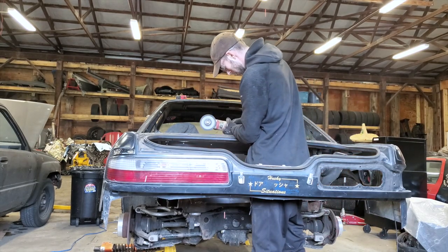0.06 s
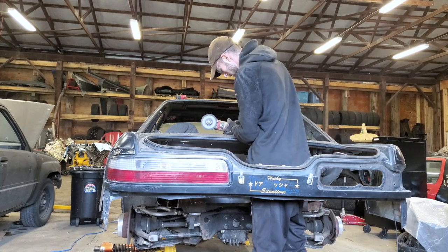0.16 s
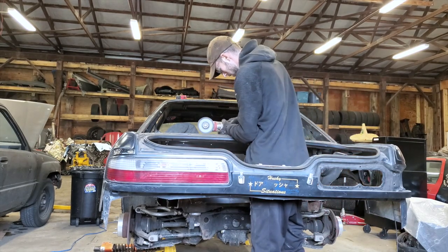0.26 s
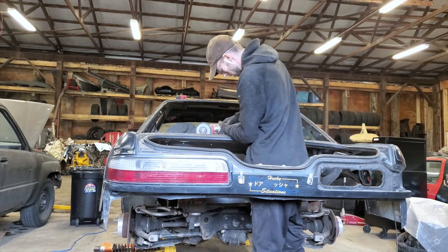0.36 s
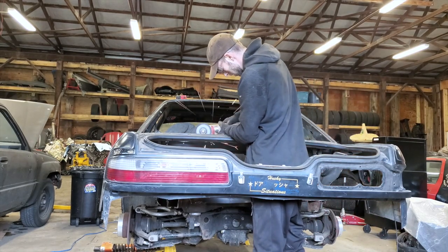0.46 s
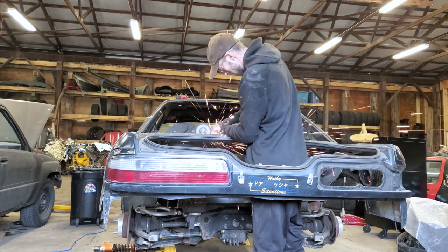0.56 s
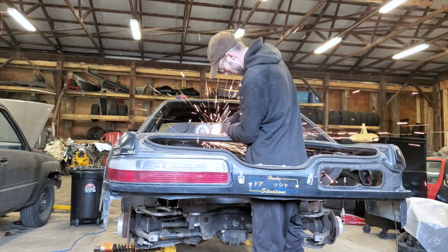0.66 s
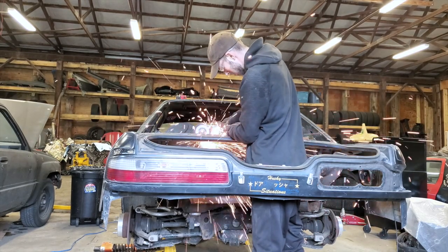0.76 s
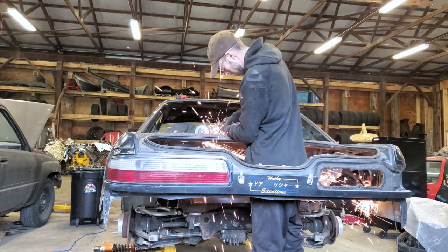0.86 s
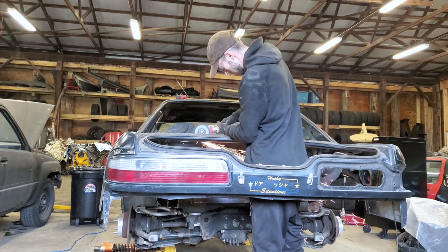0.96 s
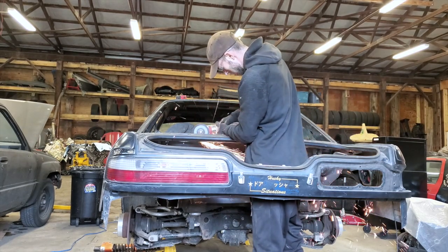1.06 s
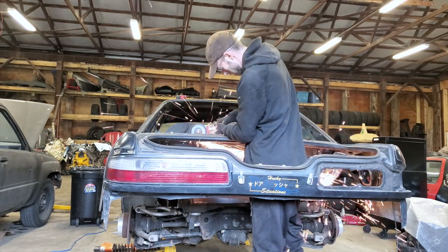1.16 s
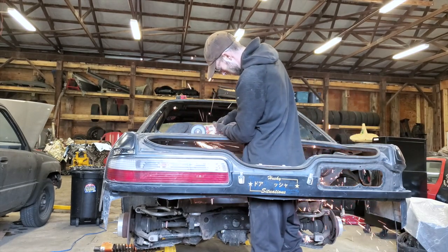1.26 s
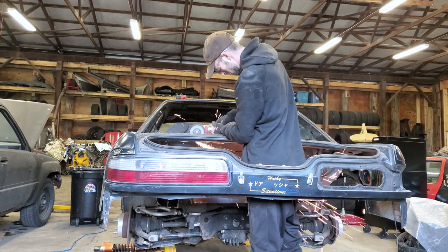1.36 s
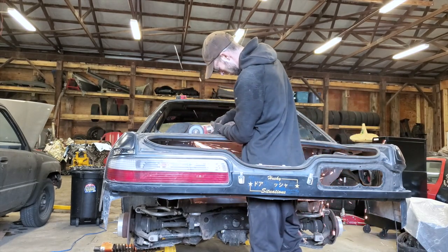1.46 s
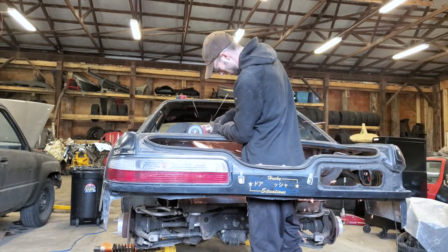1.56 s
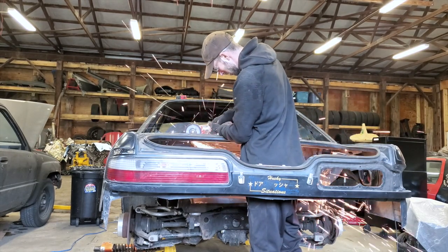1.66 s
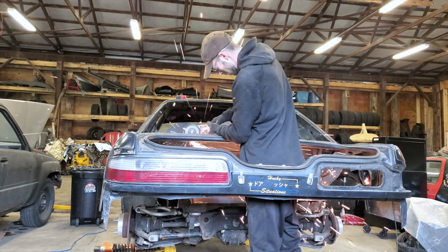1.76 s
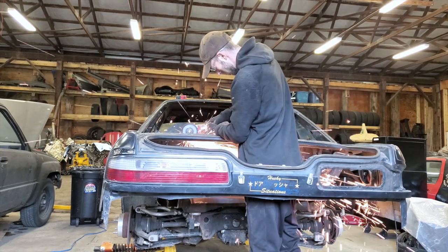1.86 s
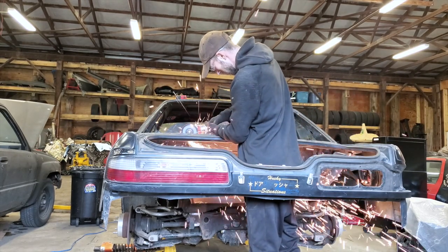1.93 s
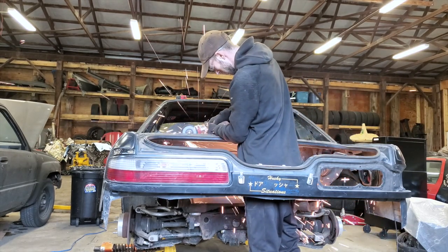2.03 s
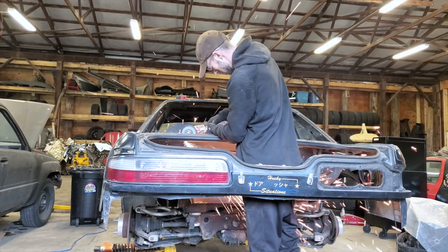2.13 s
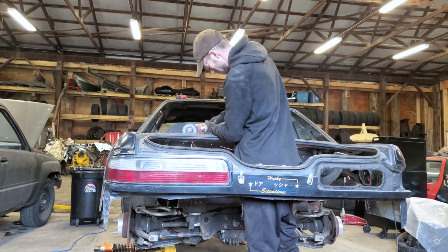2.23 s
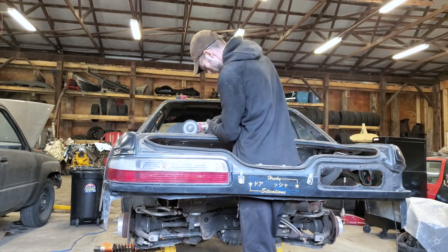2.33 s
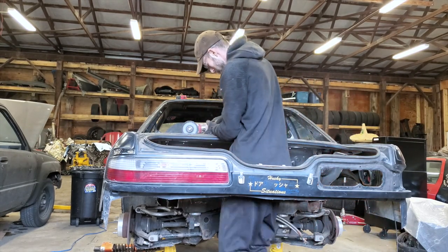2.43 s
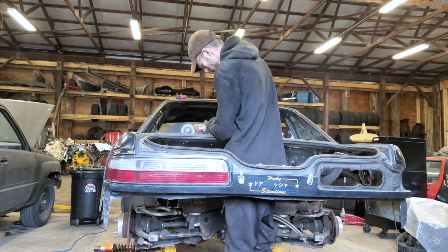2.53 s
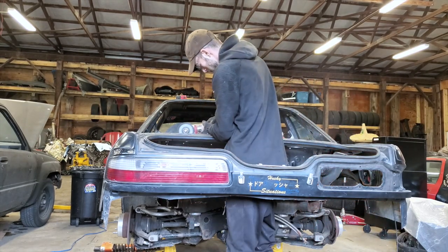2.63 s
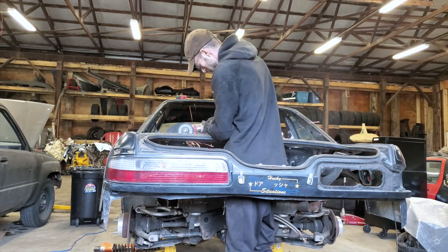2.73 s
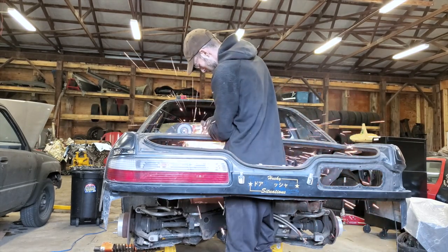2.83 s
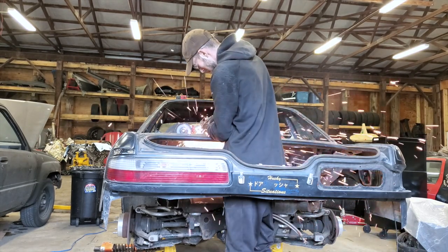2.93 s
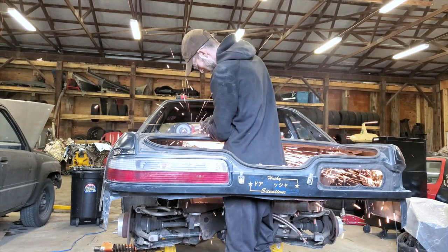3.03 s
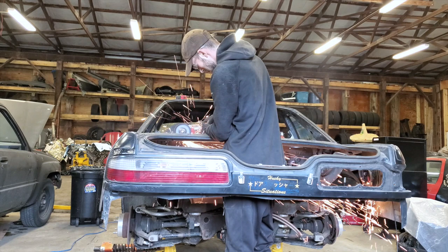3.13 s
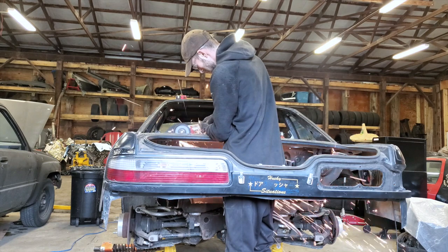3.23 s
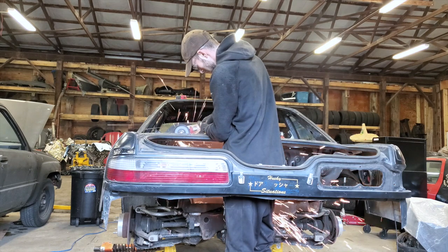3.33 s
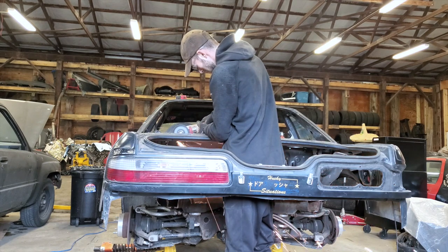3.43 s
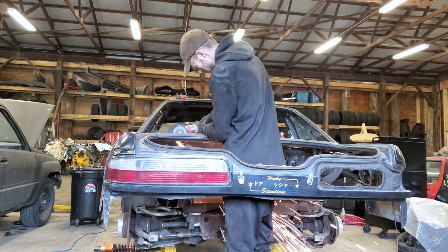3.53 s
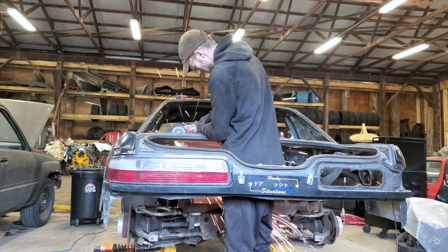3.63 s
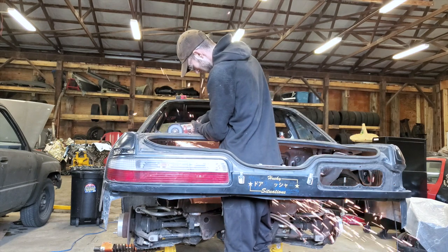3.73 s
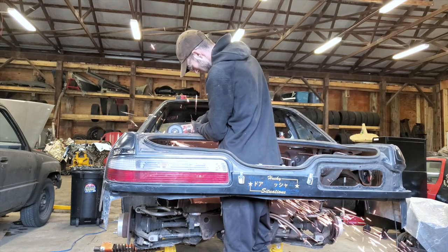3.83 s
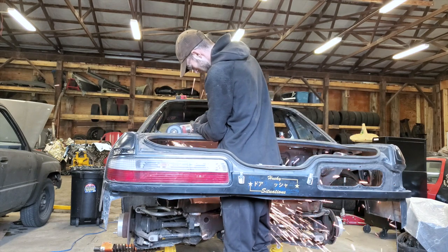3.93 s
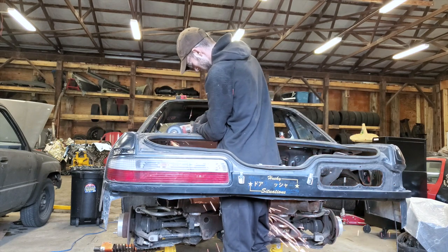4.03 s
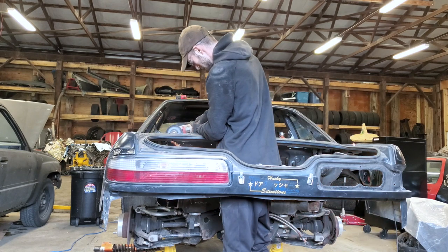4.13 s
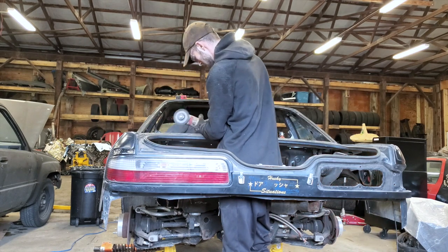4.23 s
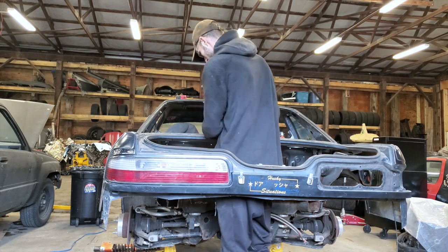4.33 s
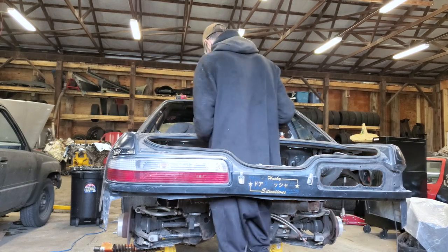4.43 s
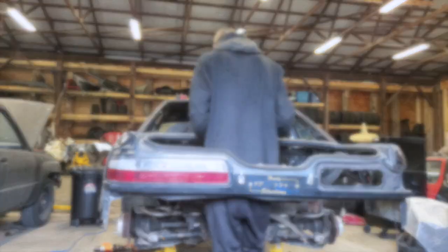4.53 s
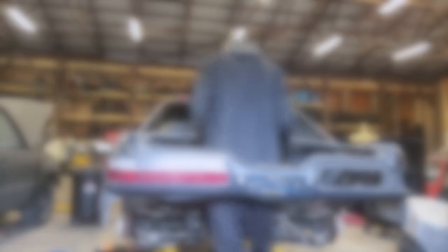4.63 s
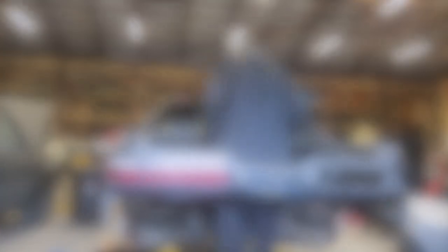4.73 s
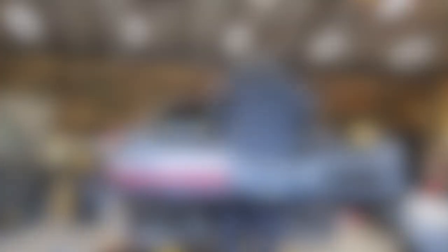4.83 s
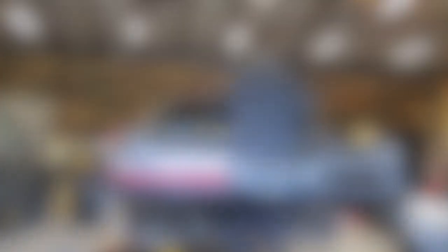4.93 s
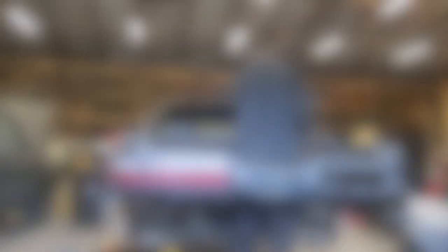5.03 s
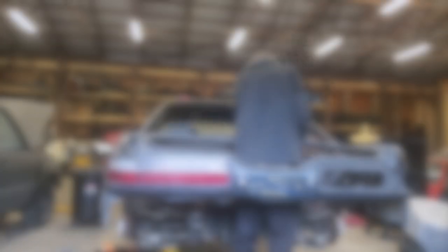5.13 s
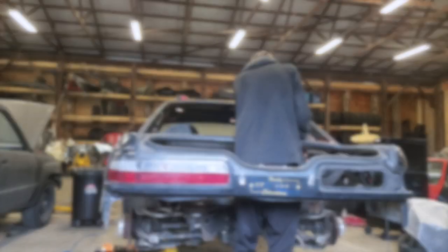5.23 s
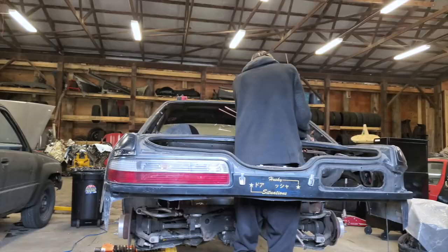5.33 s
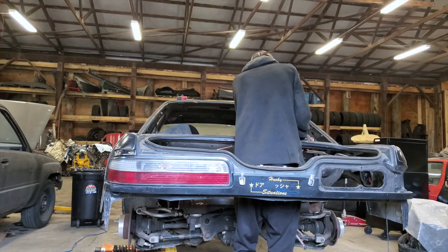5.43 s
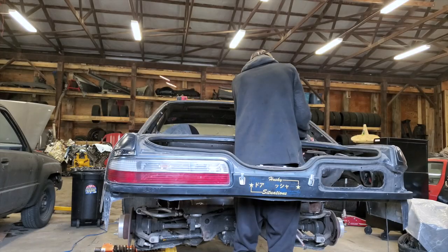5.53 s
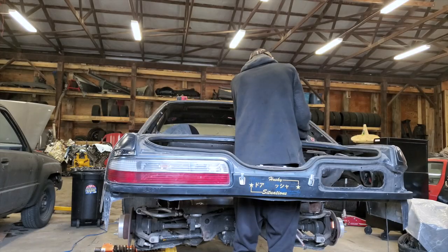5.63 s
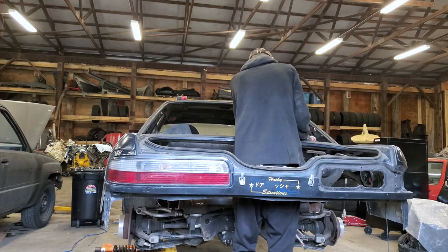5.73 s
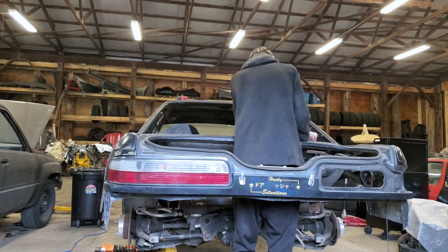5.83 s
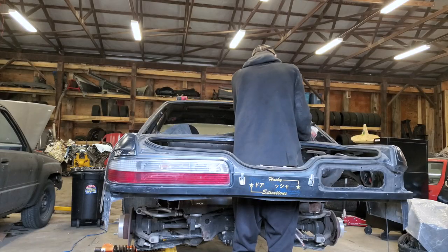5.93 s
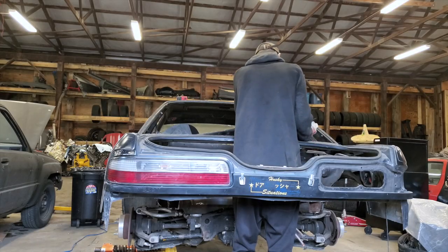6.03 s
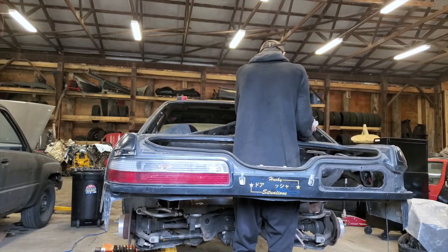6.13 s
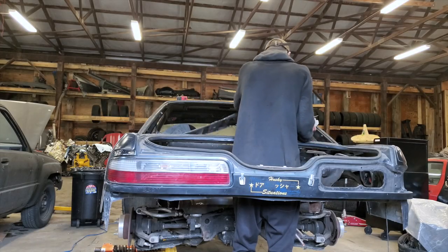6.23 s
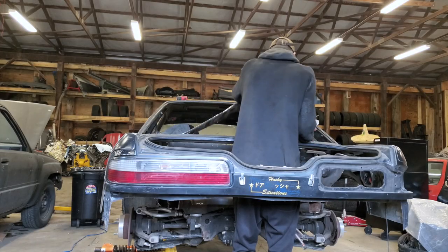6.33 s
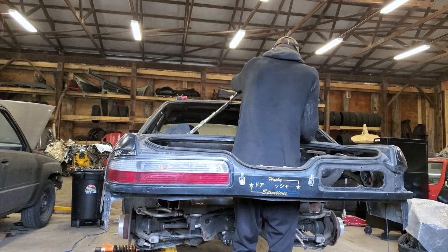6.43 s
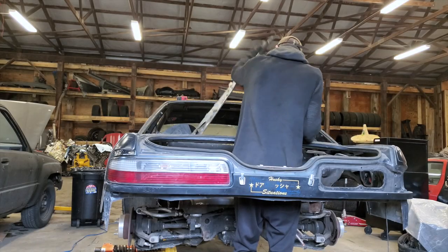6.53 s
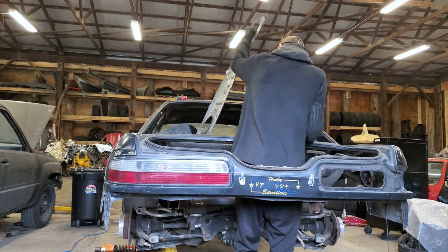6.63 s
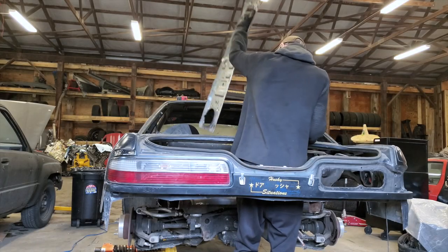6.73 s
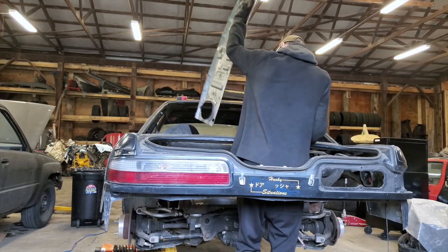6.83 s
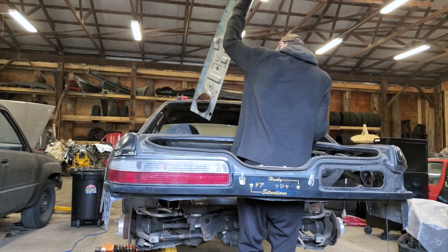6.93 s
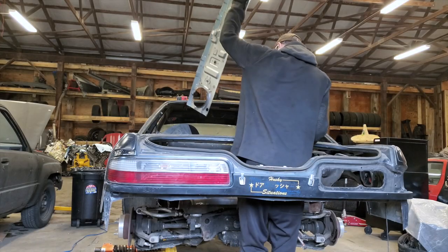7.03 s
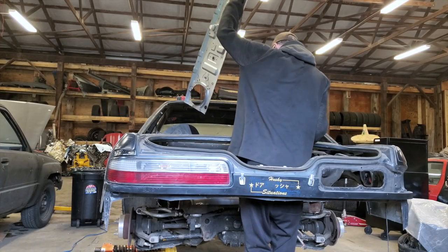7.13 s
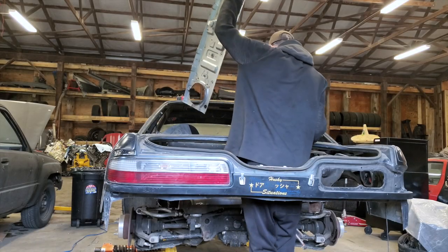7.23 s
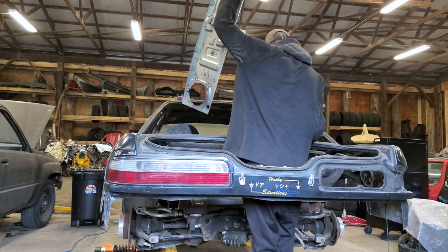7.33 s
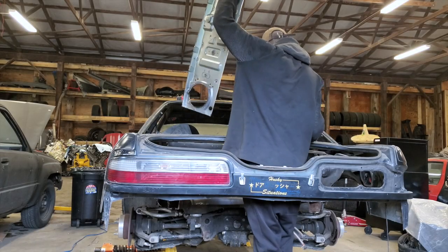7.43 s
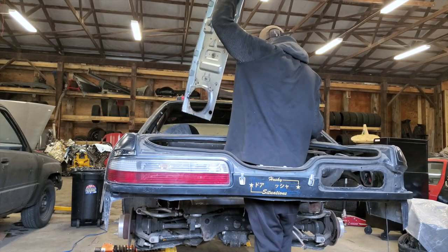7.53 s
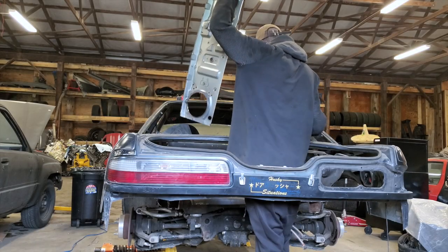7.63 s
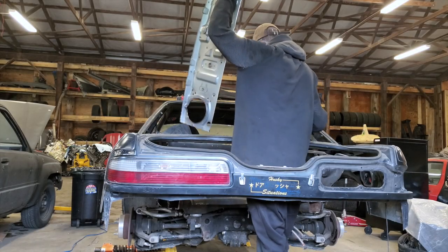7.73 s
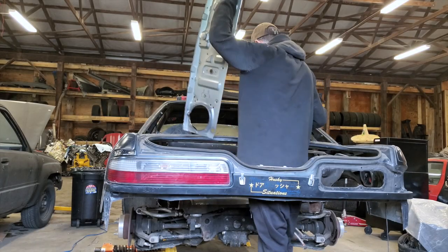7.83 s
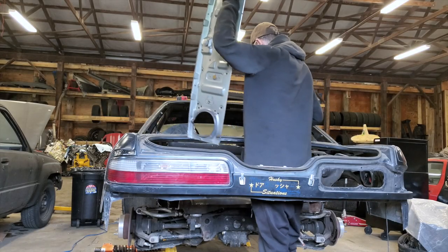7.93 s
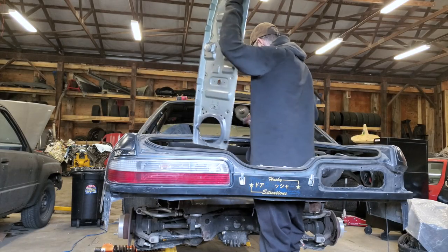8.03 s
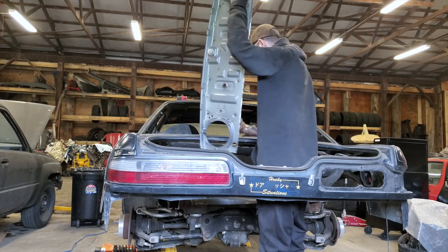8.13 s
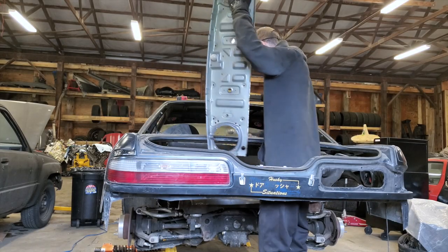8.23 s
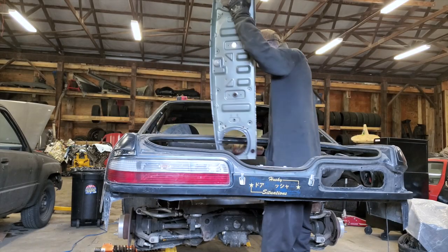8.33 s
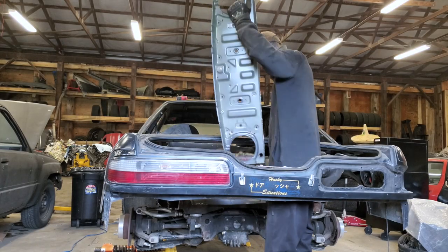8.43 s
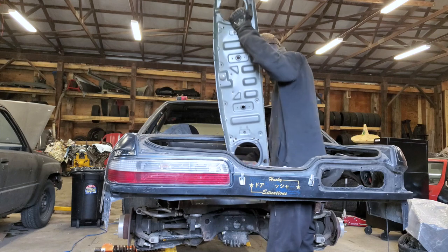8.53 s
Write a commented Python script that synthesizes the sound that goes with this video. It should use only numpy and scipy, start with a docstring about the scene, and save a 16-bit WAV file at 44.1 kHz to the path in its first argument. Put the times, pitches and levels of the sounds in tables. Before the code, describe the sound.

An angle grinder cuts sheet steel from the very start, sped up so that it sounds unnaturally high and quick. Its hissing rasp carries brief sharp screeches, and the whine sags as the disc bites and rises when freed. It spins free briefly just after the start and again around 2.2 to 2.5 seconds, then cuts until about 4.2. Between 4.4 and 5 seconds the sound blends down to natural pace, and a last, lower cut growls and rings until about 5.7. The motor then coasts down with a falling whistle, clearest near 6.4 seconds. From 6.8 the loose panel gives faint squeals, and from 7 to 8.5 it scrapes in short gritty strokes, catches on ragged edges and bumps the hollow car body about four times. A blower roars and hums underneath in the large workshop, its low rumble swelling toward the end.

```python
"""Angle grinder cutting a car body

An angle grinder cuts out a steel panel in a big workshop, where a blower roars and hums. The first
cuts pass in fast motion, four times higher and quicker: the disc bogs down as it bites and whines
up when freed. They blend into a last cut at natural pace. Then the motor coasts down, and the loose
panel scrapes and bumps as it is lifted out."""
import sys
import numpy as np
from scipy import signal
from scipy.fft import rfft, irfft, next_fast_len
from scipy.io import wavfile
from scipy.ndimage import uniform_filter1d, map_coordinates

SR = 44100
rng = np.random.default_rng(int(sys.argv[2]) if len(sys.argv) > 2 else 0)


def file_out(sig):
    """Save sig as 16-bit WAV at sys.argv[1]."""
    # one column per channel
    cols = np.atleast_2d(sig).T
    # limit, then scale
    lim = np.clip(cols, -1, 1)
    pcm = np.round(lim * 32767).astype(np.int16)
    wavfile.write(sys.argv[1], SR, pcm)


N = 377937
T = np.arange(N) / SR

PACE = 4  # how many times quicker fast motion is
GEAR = 3.47  # motor turns per disc turn

# Disc speed in each run of the motor. Each row: time in seconds, turns per second as heard.
OPENING_SPEED = [(0, 453), (.06, 520), (.09, 500)]
FIRST_SPEED = [(0.3, 382), (0.338, 469), (0.376, 504.6), (0.45, 547.4), (0.488, 636), (.582, 632.8),
               (0.67, 612.7), (.802, 536.3), (0.92, 499), (.946, 508), (1.014, 552), (1.048, 563),
               (1.106, 535.5), (1.166, 528.3), (1.24, 462), (1.284, 456), (1.328, 469.3), (1.352, 501),
               (1.42, 526.6), (1.45, 527), (1.484, 509.8), (1.632, 547.6), (1.74, 491.2), (1.856, 488),
               (1.936, 450.4), (2.0, 439.3), (2.076, 462.7), (2.22, 452), (2.3, 470.6)]
SECOND_SPEED = [(2.3, 470.3), (2.37, 518.1), (2.43, 609.4), (2.534, 665.8), (2.798, 649.2), (2.848, 631),
                (3.006, 505.8), (3.12, 460.8), (3.162, 455.8), (3.298, 461), (3.454, 497.4), (3.504, 526.4),
                (3.684, 526.6), (3.738, 509), (3.792, 457.5), (3.885, 432.2), (3.972, 438.2), (4.006, 401),
                (4.03, 394), (4.11, 415.7), (4.122, 435.4), (4.218, 493.7), (4.3, 482.4)]
LAST_SPEED = [(4.5, 156.5), (4.85, 165), (4.97, 163.7), (5.21, 159.7), (5.43, 157.5), (5.608, 153.1),
              (5.69, 154), (5.85, 131.4)]
# The disc touches the steel. Each row: start and end in seconds, force in dB, seating
# (0 is only grazing, 1 is deep in the slot).
CUTS = [(-.2, .04, -1, 1), (.305, .49, -6, .05), (.475, 2.215, 0, 1), (2.55, 2.72, -2.5, .1),
        (2.7, 4.11, -.3, 1), (4.08, 4.22, -5, .95), (4.43, 4.6, -14, .05), (4.56, 4.8, -7.5, .05),
        (4.845, 5.63, -1, .9)]
# The hand leans on the grinder. Each row: middle and half length in seconds, extra force in dB.
PUSHES = [(0.01, 0.03, 13), (0.438, 0.099, 12.5), (0.554, 0.06, 11), (0.722, .13, 10), (1.23, 0.34, 4.5),
          (2.647, 0.072, 9), (2.78, 0.062, 8), (2.979, 0.1, 10), (3.882, 0.098, 3.5), (4.057, 0.099, 3),
          (4.688, 0.11, 2.5), (5.093, 0.058, 5.5), (5.356, 0.062, 5), (5.52, 0.15, 6.5)]
# The rim loses its grip. Each row: middle and half length in seconds, share of the bite lost.
SLIPS = [(1.05, 0.083, 0.35), (1.41, 0.075, 0.27), (2.74, 0.068, 0.14), (3.55, 0.12, 0.19),
         (4.07, 0.06, 0.26)]
# Tone colour of the fast cuts and the last cut. Each row: frequency in Hz, gain in dB.
FAST_COLOUR = [(50, -38), (150, -23), (370, -18.5), (520, -15), (950, -9.5), (1500, -11), (2200, -11.5),
               (2800, -7), (4000, -7), (5500, -3.5), (6800, -7), (8500, -3.5), (11500, -6.5), (16000, -10)]
LAST_COLOUR = [(70, -59), (130, -25), (230, -16.5), (330, -15), (480, -13.5), (1000, -11.5), (1700, -11),
               (3400, -5), (5500, -6.5), (8200, -1), (10500, -2.5), (14000, 3), (16000, -2.5)]
# Where the panel rings while it is cut. Each row: frequency and width in Hz, boost in dB.
FAST_PANEL_PEAKS = [(1900, 310, 4), (2670, 310, 6.5), (3870, 220, 3), (4370, 300, 4), (7580, 260, 2)]
LAST_PANEL_PEAKS = [(607, 32, 4), (775, 25, 1.5), (952, 52, 4.5), (1137, 44, 2), (3440, 110, 4.3)]
# Bands of the sound swell and fade: ringing steel in the cuts, bright hiss while the disc spins free.
# Each row: middle and half length in seconds, frequency and width in Hz, boost in dB.
FLARES = [(0.008, 0.095, 590, 900, 10), (0.573, 0.13, 8900, 1400, 7), (0.54, 0.11, 2530, 400, 4),
          (0.69, 0.063, 6700, 1020, 2), (0.71, 0.13, 1100, 360, 3), (0.277, 0.17, 9670, 1400, 7),
          (2.07, 0.14, 12400, 2440, 2), (2.486, 0.11, 9300, 2540, 10), (2.78, 0.076, 2800, 990, 1.5),
          (2.975, 0.1, 5153, 1400, 6), (3.85, 0.076, 8300, 2600, 4.5), (4.08, 0.22, 950, 600, 9),
          (3.96, .13, 4380, 250, 7), (1.8, .08, 4410, 250, 4), (4.17, 0.32, 453, 110, 10.5),
          (5.3, 0.11, 10220, 1570, 3), (5.0, 0.061, 963, 73, 8), (5.11, 0.07, 1291, 90, 18),
          (5.09, 0.078, 1125, 77, 10), (5.12, 0.07, 3370, 110, 15), (5.07, 0.093, 4200, 530, 3.5),
          (5.31, 0.15, 2395, 150, 18), (5.42, .16, 625, 70, 7.5), (5.46, 0.08, 947, 80, 11.5),
          (5.5, 0.094, 3900, 530, 3), (5.59, 0.07, 775, 56.4, 5.5), (5.5, 0.21, 14770, 2400, 5)]
# Single overtones of the disc ring out as brief, sharp screams.
# Each row: middle and half length in seconds, multiple of the disc speed, level in dB.
SCREAMS = [(0.552, 0.039, 5, -34), (0.626, .039, 4, -30.5), (0.672, 0.046, 3, -36.5),
           (.68, 0.027, 9, -31.5), (0.73, 0.072, 5, -40), (0.746, 0.025, 6, -30), (.76, 0.037, 9, -30),
           (.8, 0.061, 14, -22.5), (0.815, 0.031, 7, -31), (0.863, 0.05, 8, -35), (1.141, .059, 7, -36),
           (1.23, 0.058, 12, -32), (1.254, 0.046, 6, -34.5), (1.28, 0.034, 7, -28.5), (1.28, 0.038, 8, -37),
           (1.434, 0.032, 7, -32.5), (1.48, 0.025, 5, -35), (1.565, 0.024, 7, -33),
           (1.618, 0.059, 5, -29.5), (1.752, 0.037, 5, -31.5), (1.802, 0.049, 9, -26),
           (1.918, 0.048, 6, -34), (1.928, 0.036, 4, -37), (1.938, 0.022, 9, -29.5),
           (1.985, 0.046, 10, -32), (2.078, 0.097, 9, -37), (2.186, .034, 6, -29), (2.766, 0.064, 3, -35),
           (2.766, 0.091, 4, -38), (2.926, 0.022, 6, -31.5), (2.964, 0.072, 5, -33), (3.01, 0.019, 15, -26),
           (3.025, 0.086, 10, -27.5), (3.19, .067, 7, -38.5), (3.27, 0.13, 10, -31.5),
           (3.566, 0.045, 9, -39), (3.587, 0.039, 5, -40), (3.794, 0.027, 6, -34), (3.876, 0.03, 10, -28),
           (3.97, 0.02, 10, -27.5), (3.926, 0.053, 6, -39), (4.03, 0.023, 11, -24), (4.094, 0.027, 9, -29)]
# The housing gives off some whine pitches best. Each row: pitch in Hz at natural pace, level in dB.
HOUSING_RESPONSE = [(170, -68), (225, -64), (275, -58), (350, -60), (430, -57), (462, -57), (550, -73)]
# Where the panel drones most in fast motion. Each row: frequency and width in Hz, boost in dB.
DRONE_PEAKS = [(526, 50, 21), (611, 58, 15.5)]
# The panel's growl in the last cut: base levels in dB at 1, 2 and 3 times the disc speed.
GROWL_LEVELS = [-43, -45.5, -43.5]
# How that growl swells. Each row: time in seconds, gain in dB.
GROWL_SWELL = [(4.9, -13), (5.13, 3), (5.35, -4.5), (5.63, -6), (5.8, -19), (6.1, -36)]
# The loose panel rubs on the body. Each row: middle and length in seconds, level in dB.
SCRAPES = [(7.182, 0.044, -39), (7.2, 0.21, -32), (7.472, 0.16, -36.5), (7.688, 0.077, -36),
           (7.803, 0.045, -33), (7.855, 0.066, -30.5), (8.159, 0.05, -31.5), (8.386, 0.085, -29.5),
           (8.513, 0.054, -31.5)]
# Where the scraped panel rings. Each row: frequency and width in Hz, gain in dB.
SCRAPE_MODES = [(1524, 400, -13), (2532, 180, 22), (4000, 670, -15), (7150, 340, -21)]
# The panel bumps the body shell. Each row: start in seconds, level in dB.
KNOCKS = [(7.036, -47), (7.378, -43), (7.674, -34.5), (7.88, -38)]
# The notes of the hollow shell. Each row: pitch in Hz, gain in dB, seconds to fade by 60 dB.
SHELL_MODES = [(179.4, -13.5, .5), (326, -5.5, 0.23), (367, -4, 0.38), (400, -5, 0.27), (661, 4, 0.14),
               (1158, 6, 0.19)]
# The ragged edge catches. Each row: start and decay time in seconds, level in dB.
CATCHES = [(7.175, 0.027, -34), (7.37, .03, -37), (7.872, .025, -38), (7.92, .02, -33), (8.04, .015, -37),
           (8.08, 0.016, -32), (8.125, .012, -38), (8.163, 0.014, -34), (8.19, .03, -34),
           (8.225, .018, -32), (8.365, .012, -39), (8.425, .03, -35), (8.46, .02, -35)]
# Tone colour of those catches. Each row: frequency in Hz, gain in dB.
CATCH_COLOUR = [(300, -13), (1500, 1.5), (4300, -1), (5800, -9), (7400, -10), (9000, -13), (16000, -18)]
# The bent panel sings as it comes free. Each row: middle and half length in seconds, level in dB.
SQUEALS = [(6.834, .045, -41), (6.94, 0.03, -41), (7.247, 0.11, -49), (7.63, .035, -44)]
# Background roar: the grinder's air rush fades, then a low rumble swells.
# Each row: time in seconds, then low, middle and high band levels in dB.
ROAR_LEVELS = [(5.8, -66, -34.5, -37.5), (6.35, -64.5, -36, -42), (6.7, -68, -38, -45),
               (7.0, -59, -35, -42.5), (7.2, -54.5, -32.5, -41), (8.0, -50.5, -33.5, -43.5),
               (8.57, -48.5, -35, -44)]
# Tone colour of the roar. Each row: frequency in Hz, gain in dB.
ROAR_COLOUR = [(15, -55), (25, -20), (76, -4.5), (89, -14.5), (130, -22.5), (373, -13.5), (545, -9.5),
               (887, 0), (1020, -4), (1160, 1), (2160, -3.5), (2550, 1.5), (6050, -9), (12200, -10.5),
               (16000, -15.5)]
# Peaks and dips in the roar. Each row: frequency and width in Hz, gain in dB.
ROAR_PEAKS = [(437, 86, 7), (920, 87, 2), (1130, 18, -5), (2310, 150, 0)]
# The blower's hum in fast motion. Each row: time in seconds, level in dB.
FAST_HUM = [(0, -73), (2.0, -76), (2.3, -72.5), (2.7, -61), (2.8, -86), (4.4, -77), (4.9, -84)]
# How alike the room sounds left and right. Each row: frequency in Hz, correlation (1 is the same).
STEREO_LIKENESS = [(100, 0.95), (300, 0.95), (600, 0.59), (1500, 0.061), (4000, -0.03), (14000, -0.081)]


def fast_cuts(force, seating, push):
    """Cuts in fast motion: the rim skitters when it spins fast and bites firmly as it bogs down."""
    skitter_speed, stall_speed = 733, 420  # turns per second
    speed = disc_speed([OPENING_SPEED, FIRST_SPEED, SECOND_SPEED], coast_s=0.68)
    angle = turns(speed, unsteady=0.00123)
    bite = seating * (1 - (speed / skitter_speed) ** 5.8)
    bite *= np.minimum(speed / stall_speed, 1) ** 3.1  # a disc dragged too slow loses its bite too
    bite *= 1 - swells(SLIPS)
    rasp, skitter = grinding(angle, bite, FAST_PANEL_PEAKS, memory=0.73, harmonics=42)
    sizzle = filtered(skitter, lambda hz: colour([(0, 0.44)], [(10100, 750, 2.2)], hz))
    steel = filtered(rasp + sizzle, lambda hz: amp(along(FAST_COLOUR, hz)))
    steel = flares(steel, ripple_db=2.5)
    # the worker moves, so the sound shifts between two patterns of echoes
    stance = np.pi / 4 * (1 + np.sin(2 * wobble(8)))
    steel = sum(weight * workshop(steel, t60=0.11, wet_db=5, pace=PACE, shade_db=1.6)
                for weight in (np.cos(stance), np.sin(stance)))
    pressure = unit(amp(0.44 * wobble(40) + 0.48 * wobble(250)))
    gains = band_gains(force, push, cut_db=(-50.5, -34, -22.5), free_db=(-76, -42, -37.5),
                       db_per_push=(0.61, 0.81, 0.4361))
    cut = three_bands(steel, gains, low_hz=1440, high_hz=6920) * pressure * fade(4.93, 4.67)
    whine = tone(GEAR * angle, whine_db(speed / PACE, seating) + 7.5, flutter_db=-4)
    # the slightly unbalanced disc shakes the panel once a turn
    drone = tone(angle, -72.5 + 0.64 * push, flutter_db=3.5)
    drone *= force * seating * colour([(0, 0)], DRONE_PEAKS, speed)
    disc_note = tone(angle, -64.5, flutter_db=-7) * (speed / skitter_speed) ** 7.8
    return cut + screams(angle) + (whine + drone + disc_note) * fade(4.62, 4.3)


def last_cut(force, seating, push):
    """The last cut, further right: the panel growls, then the motor coasts with a falling whistle."""
    speed = disc_speed([LAST_SPEED], coast_s=2.3)
    angle = turns(speed, unsteady=0.00091)
    rasp, skitter = grinding(angle, 0.89 * seating, LAST_PANEL_PEAKS, memory=0.8, harmonics=108)
    steel = filtered(rasp + skitter, lambda hz: amp(along(LAST_COLOUR, hz)))
    steel = workshop(steel, t60=0.43, wet_db=4.5, lag_ms=0.087, shade_db=3.0)
    steel = flares(steel, ripple_db=1.5)
    pressure = unit(amp(0.5 * wobble(12) + 1.1 * wobble(300) + 1.5 * seating * np.cos(2 * np.pi * angle)))
    gains = band_gains(force, push, cut_db=(-38, -33, -24), free_db=(-38.5, -35, -38),
                       db_per_push=(0.8, 0.79, 0.85))
    cut = three_bands(steel, gains, low_hz=1390, high_hz=6450) * pressure
    cut *= fade(4.51, 4.98) * fade(5.92, 5.67)
    peak_s, rise_s, fall_db_per_s = 6.36, 0.37, 20
    whistle_db = -47 - fall_db_per_s * np.maximum(T - peak_s, 0)
    whistle = tone(132 * angle + 0.5 * wobble(200), whistle_db, flutter_db=2.5)
    whistle *= fade(peak_s - rise_s, peak_s)
    whine = tone(GEAR * angle, whine_db(speed, seating), flutter_db=2)
    growl = sum(tone(multiple * angle, db + curve(GROWL_SWELL), flutter_db=1.0)
                for multiple, db in enumerate(GROWL_LEVELS, 1))
    growl *= fade(4.8, 5.04) * fade(6.2, 6.1)
    motor = workshop(whine + whistle, t60=0.083, wet_db=-6.5, lag_ms=0.123, shade_db=15)
    return cut + growl + motor * fade(4.5, 5.5)


def rim_contact():
    """How hard the rim presses on the steel, and how far it has settled in the slot (0 to 1)."""
    attack_s, graze_s, release_s, settle_s = 0.017, 0.043, 0.054, 0.0095
    force, seating = np.zeros(N), np.zeros(N)
    for start, end, db, seat in CUTS:
        rise_s = attack_s + graze_s * (1 - seat)  # a grazing rim swells in more slowly
        touch = fade(start, start + rise_s) * decay_after(end, release_s)
        force = np.maximum(force, amp(db) * touch)
        seating = np.maximum(seating, seat * np.sqrt(touch) * (1 - decay_after(start, settle_s)))
    return force, np.clip(seating, 0, 1)


def disc_speed(runs, coast_s):
    """Turns per second: after each driven run the disc coasts until the next one begins."""
    speed = np.zeros(N)
    for run in runs:
        run_speed = curve(run) * decay_after(run[-1][0], coast_s)
        speed = np.where((T >= run[0][0]) | (speed == 0), run_speed, speed)
    return speed


def grinding(angle, bite, panel_peaks, memory, harmonics):
    """The same grit passes once a turn, slowly wears and rings the panel; a loose rim only sizzles."""
    grit = rng.standard_normal((int(angle[-1]) + 3, harmonics, 2)) @ [1, 1j]
    for _ in range(2):  # more memory makes each turn more like the one before
        grit = signal.lfilter([1 - memory], [1, -memory], grit, axis=0)
    rim_points = 1024
    rim = irfft(np.pad(grit, ((0, 0), (1, 0))), rim_points)
    rub = map_coordinates(rim, [angle, angle % 1 * rim_points], order=1, mode="grid-wrap")
    seated = unit(filtered(rub, lambda hz: colour([(0, 0)], panel_peaks, hz)))
    # a loose disc touches hardest on one side of each turn
    loose = unit(rng.standard_normal(N) * (1 + 0.43 * np.cos(2 * np.pi * angle)))
    share = np.clip(bite, 0, 1)
    return np.sqrt(share) * seated, np.sqrt(1 - share) * loose


def band_gains(force, push, cut_db, free_db, db_per_push):
    """Low, middle and high gains: grinding grows with force, over the rush of the free disc."""
    return [np.hypot(force * amp(cut + growth * push), amp(free))
            for cut, free, growth in zip(cut_db, free_db, db_per_push)]


def flares(x, ripple_db):
    """Bands of ringing or hiss swell and fade, while many weaker peaks drift at random."""
    hz, t, spectrum = signal.stft(x, SR, nperseg=1024)
    lift_db = sum(db * np.outer(1 / (1 + (2 * (hz - pitch) / width) ** 2), bell(t, middle, half))
                  for middle, half, pitch, width, db in FLARES)
    drift = uniform_filter1d(rng.standard_normal(spectrum.shape), size=8, axis=0)
    drift = unit(uniform_filter1d(drift, size=11, axis=1))
    return signal.istft(spectrum * amp(lift_db + ripple_db * drift), SR, nperseg=1024)[1][..., :N]


def screams(angle):
    """Single overtones of the disc ring out as brief, sharp screams that follow its speed."""
    sound = np.zeros(N)
    for multiple in sorted({row[2] for row in SCREAMS}):
        swell = swells([(middle, half, amp(db)) for middle, half, k, db in SCREAMS if k == multiple])
        sound += swell * tone(multiple * angle + 0.053 * wobble(120), 0, flutter_db=1.5)
    return workshop(sound, t60=0.1, wet_db=-13, pace=PACE, lag_ms=0.03, shade_db=1.6)


def whine_db(speed, seating):
    """The level of the motor's whine follows its pitch and drops under load."""
    return along(HOUSING_RESPONSE, GEAR * speed) - 18 * seating


def loose_panel():
    """The cut edge scrapes in gritty strokes and bumps the hollow shell."""
    strokes = sum(amp(db) * bell(T, middle, length / 2) for middle, length, db in SCRAPES)
    grit = rng.standard_normal(N) * amp(5.7 * wobble(400))
    ring = lambda hz: sum(amp(db) * 1j * hz * width / (pitch ** 2 - hz ** 2 + 1j * hz * width)
                          for pitch, width, db in SCRAPE_MODES)
    sound = strokes * unit(filtered(grit, ring))
    t = T[:SR // 2]
    for start, db in KNOCKS:
        bump = sum(amp(db + gain_db + rng.normal(0, 1.8) - 60 * t / t60) * np.sin(2 * np.pi * hz * t)
                   for hz, gain_db, t60 in SHELL_MODES)
        sound[round(start * SR):][:len(t)] += bump * (1 - np.exp(-t / 0.0017))
    return workshop(sound, t60=0.77, wet_db=3.5)


def ragged_edge(squeal_hz=1207):
    """The edge catches in short rasps, and the sheet sings as it slips."""
    snags = sum(amp(db) * fade(start, start + 0.0021) * decay_after(start, decay_s)
                for start, decay_s, db in CATCHES)
    grit = rng.standard_normal(N) * amp(5.2 * wobble(400))
    rasps = snags * unit(filtered(grit, lambda hz: amp(along(CATCH_COLOUR, hz))))
    squeal = tone(turns(squeal_hz, unsteady=0.004), 0, flutter_db=5.5)
    squeal *= swells([(middle, half, amp(db)) for middle, half, db in SQUEALS])
    return workshop(rasps, t60=0.55, wet_db=1) + workshop(squeal, t60=0.5, wet_db=-10)


def background_roar(hum_hz=77.8):
    """Air roars through the workshop over a blower's hum, both four times higher in fast motion."""
    air = lambda pace: filtered(diffuse(rng.standard_normal((2, N)), pace),
                                lambda hz: colour(ROAR_COLOUR, ROAR_PEAKS, hz / pace))
    low_db, middle_db, high_db = (curve(ROAR_LEVELS, column) for column in (1, 2, 3))
    roar = three_bands(air(1), amp([low_db, middle_db, high_db]), low_hz=109, high_hz=4950)
    roar *= amp(1.02 * wobble(20)) * fade(4.51, 5.04)
    # above the bass, the roar is louder on the right
    roar = filtered(roar, lambda hz: amp(np.outer([-0.6, 1.6], hz / (hz + 300))))
    fast_roar = amp(-43) * unit(air(PACE)) * fade(4.9, 4.5)
    rumble = amp(-98) * unit(filtered(rng.standard_normal(N), lambda hz: 1 / (1 + (hz / 120) ** 2)))
    cycles = np.cumsum(hum_hz * (1 + 0.0108 * wobble(10))) / SR
    hum = tone(cycles, -47 + 1.9 * (low_db - low_db.max()), flutter_db=1.5) * fade(4.5, 4.86)
    fast_hum = tone(PACE * cycles, curve(FAST_HUM), flutter_db=4.0) * fade(5.0, 3.9)
    return roar + fast_roar + rumble + hum + fast_hum


def workshop(x, t60, wet_db, pace=1, lag_ms=0, shade_db=0):
    """Add echoes that fade 60 dB in t60 seconds; lag delays the left side and shade dulls it."""
    tail = diffuse(rng.standard_normal((2, N)) * amp(-60 * T / t60), pace)[:, :SR]
    echo = signal.fftconvolve(x[None], tail / np.linalg.norm(tail[0]), axes=1)[:, :N]
    left = filtered(x, lambda hz: np.exp(-2j * np.pi * hz * lag_ms / 1000))
    pair = (np.array([left, x]) + amp(wet_db) * echo) / np.hypot(1, amp(wet_db))
    shade = lambda hz: amp(shade_db * np.outer([-0.5, 0.5], hz ** 2 / (hz ** 2 + 350 ** 2)))
    return filtered(pair, shade)


def diffuse(pair, pace=1):
    """Mix two noises into sound from all around: alike in the bass, different in the treble."""
    blend = lambda hz: np.arccos(np.clip(along(STEREO_LIKENESS, hz / pace), -1, 1)) / 2
    mid, side = filtered(pair, lambda hz: np.array([np.cos(blend(hz)), np.sin(blend(hz))]))
    return np.array([mid + side, mid - side])


def three_bands(x, gains, low_hz, high_hz):
    """Split x into low, middle and high bands and set the strength of each."""
    below = lambda edge: filtered(x, lambda hz: 1 / (1 + (hz / edge) ** 10))
    low, low_and_middle = below(low_hz), below(high_hz)
    bands = [low, low_and_middle - low, x - low_and_middle]
    return sum(unit(band) * gain for band, gain in zip(bands, gains))


def filtered(x, response):
    """Scale each frequency in x by response(hz)."""
    size = next_fast_len(N + SR // 4, True)
    return irfft(rfft(x, size) * response(np.fft.rfftfreq(size, 1 / SR)), size)[..., :N]


def colour(spectrum, peaks, hz):
    """Gain of a broad spectrum with resonant peaks on top."""
    peaks_db = sum(db / (1 + (2 * (hz - pitch) / width) ** 2) for pitch, width, db in peaks)
    return amp(along(spectrum, hz) + peaks_db)


def tone(cycles, level_db, flutter_db):
    """A pure tone that flutters in strength."""
    return np.sqrt(2) * np.sin(2 * np.pi * cycles) * amp(level_db + flutter_db * wobble(24.99))


def turns(speed, unsteady):
    """Turns done so far at a slightly unsteady speed."""
    return np.cumsum(speed * (1 + unsteady * wobble(60))) / SR


def wobble(rate):
    """A smooth curve through random points, rate of them a second."""
    coarse = T[::16]
    points = rng.standard_normal(int(N * rate / SR) + 4)
    return np.interp(T, coarse, map_coordinates(points, [coarse * rate]))


def swells(rows):
    """Smooth bumps. Each row: middle and half length in seconds, height."""
    coarse = T[::16]
    return np.interp(T, coarse, sum(height * bell(coarse, middle, half) for middle, half, height in rows))


def bell(t, middle, half):
    """One smooth bump of height 1."""
    return np.exp(-((t - middle) / half) ** 2)


def fade(start, end):
    """A ramp from 0 at start to 1 at end; it fades out if end comes first."""
    return np.clip((T - start) / (end - start), 0, 1)


def decay_after(start, decay_s):
    """Stay at 1 until start, then die away."""
    return np.exp(-np.maximum(T - start, 0) / decay_s)


def curve(rows, column=1):
    """One column of a time table, filled in for every sample."""
    rows = np.asarray(rows)
    return np.interp(T, rows[:, 0], rows[:, column])


def along(points, hz):
    """Read between (Hz, value) points on a log frequency scale."""
    frequencies, values = np.transpose(points)
    return np.interp(np.log(hz + 1), np.log(frequencies + 1), values)


def amp(db):
    """Turn decibels into a gain."""
    return 10 ** (np.asarray(db) / 20)


def unit(x):
    """Scale x to an average strength (rms) of 1."""
    return x / np.sqrt(np.mean(x ** 2) + 1e-20)


def scene():
    """The grinder, the loose panel and the background together."""
    force, seating = rim_contact()
    push = swells(PUSHES)
    grinder = fast_cuts(force, seating, push) + last_cut(force, seating, push)
    return grinder + loose_panel() + ragged_edge() + background_roar()


def record(dry):
    """Remove the treble above 16000 Hz."""
    return filtered(dry, lambda hz: hz < 16000)


dry = scene()
out = record(dry)
file_out(out)
```